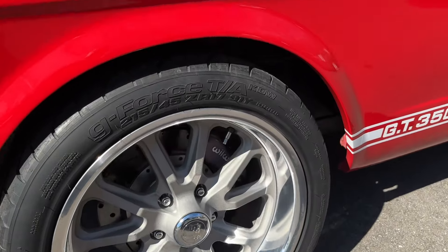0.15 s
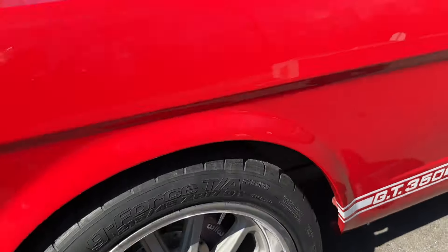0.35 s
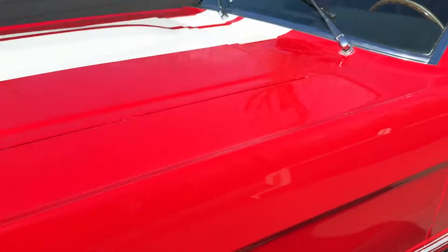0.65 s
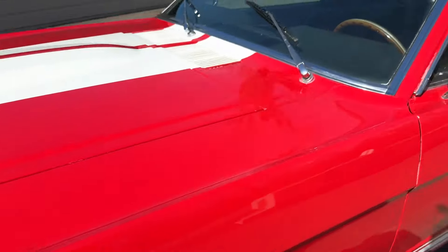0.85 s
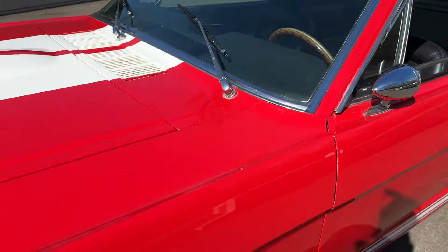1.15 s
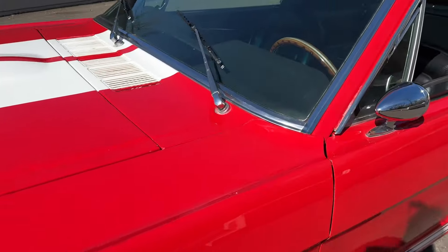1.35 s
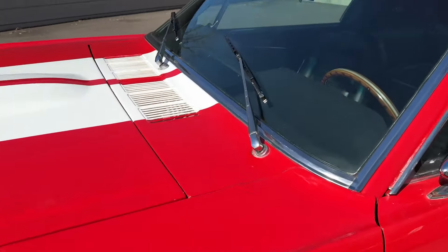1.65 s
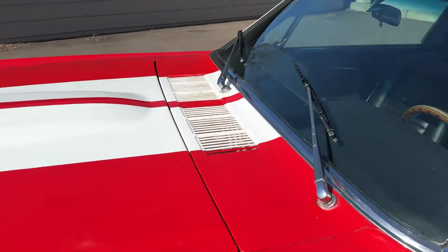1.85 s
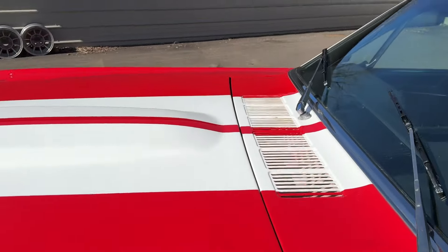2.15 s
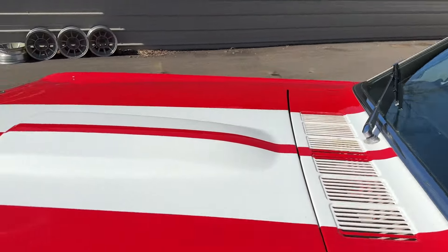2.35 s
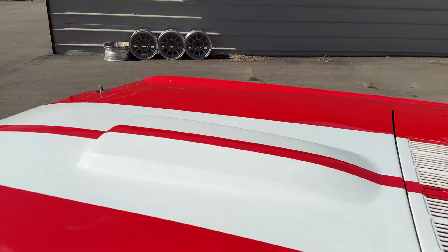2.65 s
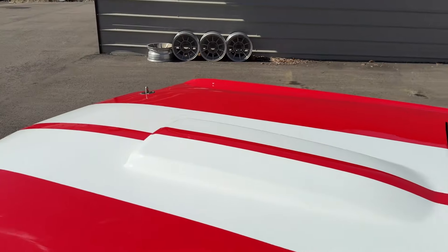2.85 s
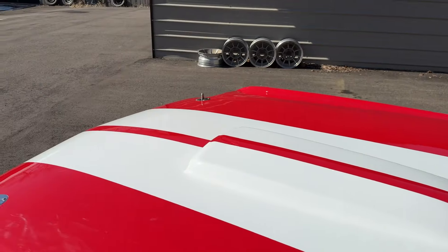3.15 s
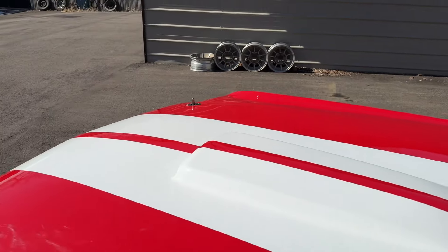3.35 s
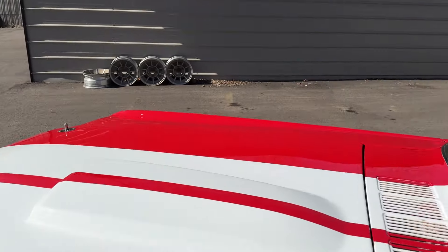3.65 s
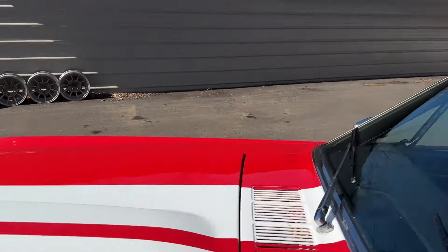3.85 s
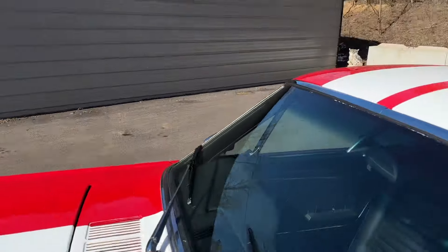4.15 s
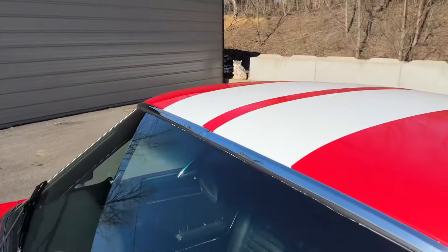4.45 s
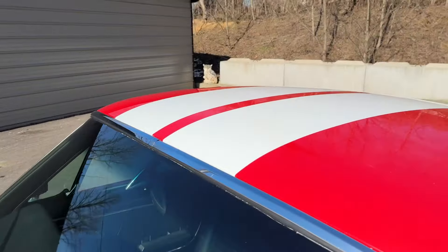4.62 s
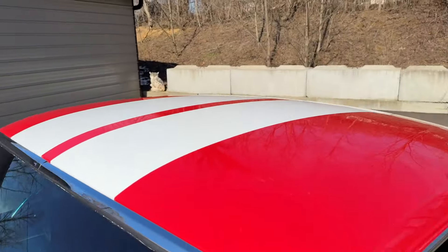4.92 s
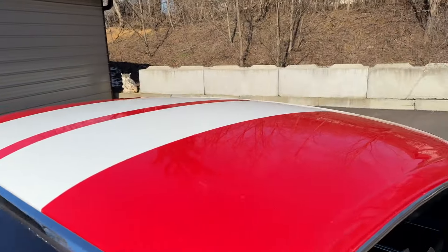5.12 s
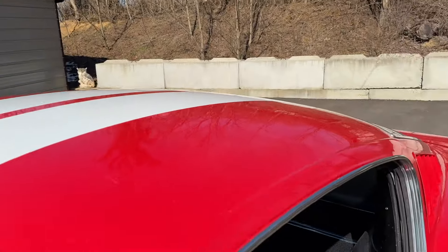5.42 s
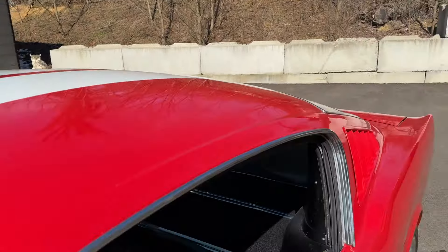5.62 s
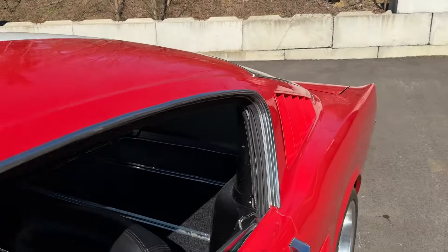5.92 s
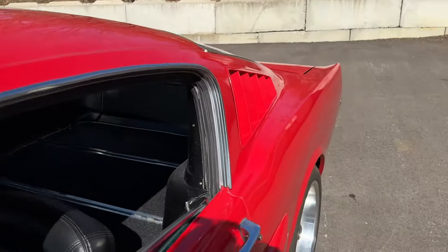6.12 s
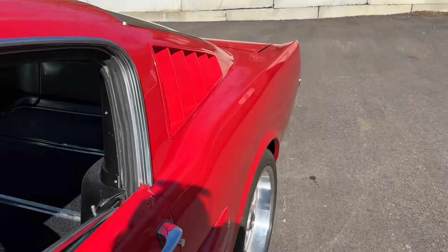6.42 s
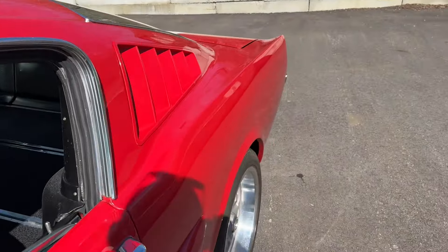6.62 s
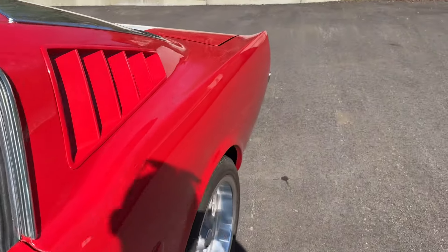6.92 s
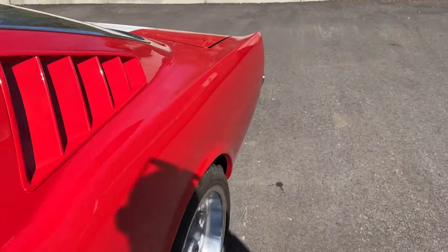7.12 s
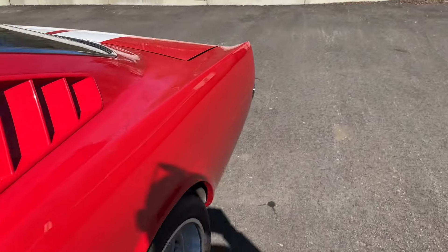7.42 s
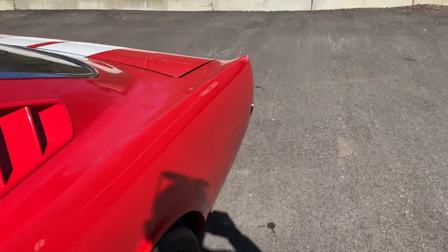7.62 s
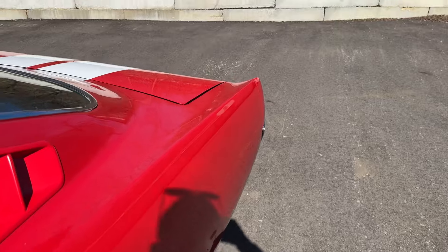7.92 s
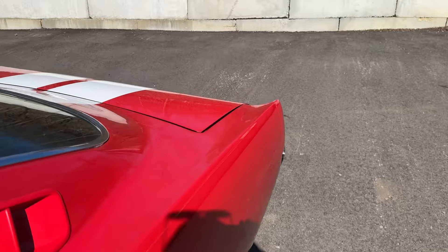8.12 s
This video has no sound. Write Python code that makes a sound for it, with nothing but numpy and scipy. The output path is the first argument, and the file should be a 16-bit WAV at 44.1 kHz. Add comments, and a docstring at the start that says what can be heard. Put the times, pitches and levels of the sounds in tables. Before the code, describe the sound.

A large V8 car engine idles with a lumpy, pulsing beat, its exhaust growing throatier with sharp puffs and faint metallic pings.

```python
"""A walled yard, where a large V8 idles with a lope as a phone is carried from the bonnet to the tail.
Every second engine cycle burns well: the firings swell, boom in the exhaust and echo off the walls.
Gas rushes and puffs from the tailpipes, and a pipe tip pings now and then. Valve gear beats along;
intake hiss and fan fall back with the bonnet. Left and right are out of phase in the treble."""
import sys
import numpy as np
from scipy import signal
from scipy.fft import rfft, irfft, next_fast_len
from scipy.io import wavfile
from scipy.ndimage import uniform_filter1d

SR = 44100
rng = np.random.default_rng(int(sys.argv[2]) if len(sys.argv) > 2 else 0)


def wav_out(sig):
    """Save sig, one row per channel (or a flat mono array), as 16-bit PCM at SR to the path in sys.argv[1]."""
    wavfile.write(sys.argv[1], SR, np.round(np.clip(np.atleast_2d(sig).T, -1, 1) * 32767).astype(np.int16))


N = 364702
FREQS = np.fft.rfftfreq(next_fast_len(N + 8192), 1 / SR)

def amp(db):
    return 10 ** (np.asarray(db) / 20)

def unit(x):
    return x / np.sqrt(np.mean(x ** 2) + 1e-20)

def along(points, hz):
    """Read (Hz, value) points on a log axis."""
    f, value = np.transpose(points)
    return np.interp(np.log(hz + 1), np.log(f + 1), value)

def curves(rows):
    """An automation curve for each column after the time."""
    times, *columns = np.transpose(rows)
    return [np.interp(np.arange(N) / SR, times, column) for column in columns]

def filtered(x, response):
    size = 2 * (len(FREQS) - 1)
    return irfft(rfft(x, size) * response(FREQS), size)[..., :N]

def ringing(x, centre, width, db):
    """Steep resonances side by side, brought to rms 1."""
    f = np.geomspace(10, SR / 2, 1500)[:, None]
    power = ((f * width) ** 2 / ((centre ** 2 - f * f) ** 2 + (f * width) ** 2)) ** 2
    return unit(filtered(x, lambda hz: np.interp(hz, f[:, 0], np.sqrt(power @ amp(2 * db)))))

def rush(patchy_db, spectrum=((20, 0),)):
    """Two unrelated noises of rms 1 that share patches of random gain."""
    real, imag = rng.standard_normal((2, 2, 257, N // 192 + 3))
    patches = uniform_filter1d(rng.standard_normal(real.shape[1:]), size=4, axis=0)
    patches = unit(uniform_filter1d(patches, size=9, axis=1))
    gain = amp(patchy_db * patches + along(spectrum, np.fft.rfftfreq(512, 1 / SR))[:, None])
    return unit(signal.istft((real + 1j * imag) * gain, nperseg=512, noverlap=320)[1][:, :N])

def train(times, sizes):
    """Impulses, brought to rms 1."""
    heard = (times > 0) & (times < (N - 1) / SR)
    return unit(np.bincount((times[heard] * SR).astype(int), sizes[heard], N))

def pumping(pulses, steady, t60, rise_ms=8):
    """A steady flow plus a burst that swells and dies with each pulse."""
    span = int(rise_ms * SR / 2000)
    swell = uniform_filter1d(uniform_filter1d(pulses, span), span)
    bursts = unit(signal.lfilter([1], [1, -amp(-60 / (t60 * SR))], swell))
    return unit(steady + bursts)

# The lope's swells, sixteen firings apart. Each row: heart in seconds, strength in dB,
# depth of the next lull as a share of the usual, that lull's delay in firings.
SWELLS = [(-.23, 1.5, 0.18, 0), (0.09, -1, 0.34, -0.91), (.390, -1.5, 1.1, -0.48), (0.719, 1, 0.84, -1.1),
          (1.038, -0.5, 1.2, 0.27), (1.353, 1, 1.05, -0.45), (1.671, 1.5, 1.52, 0.23),
          (1.985, -0.5, 0.8, 1), (2.300, -1, 1.14, 0.6), (2.631, 0.5, 1.13, -0.06), (2.934, -1, 0.69, 0.65),
          (3.263, -1, 0.97, -.4), (3.581, 1, 1.1, 0.64), (3.898, -1, 0.76, 1), (4.213, -0.5, 1.04, .4),
          (4.523, 1, 0.92, -0.24), (4.835, -0.5, 0.94, 1), (5.158, -0.5, 1.2, .6), (5.485, 1.5, 1.42, 0.45),
          (5.798, 1, .9, 0.5), (6.097, 0, 0.85, -0.57), (6.403, -0.5, 0.87, .3), (6.740, -0.5, .6, -1.1),
          (7.015, -1, 1.04, -0.22), (7.337, 1.5, 0.87, 0.2), (7.669, -1.5, 0.92, 0.9), (7.985, 0, 0.51, .6),
          (8.30, -3.5, 1.0, 0)]
# Firing order; unequal pipes delay some pulses. Each row: delay in ms, accent in dB.
CYLINDERS = [(0, -0.5), (1, -6.5), (-2, -1.5), (-4, -7), (-5.5, -3), (-6, -2.5), (-2, -1), (-2, -6)]

def firings(surge_ms, jitter_ms, scatter_db):
    """The cylinders fire in turn, a little early or late, strong or weak."""
    count = np.arange(16 * (len(SWELLS) - 1))
    late_ms, accent_db = np.transpose(CYLINDERS)[:, count % 8]
    jitter, scatter = rng.standard_normal((len(count), 2)).T
    early_ms = surge_ms * np.sin(2 * np.pi * count / 16)  # the crank speeds up after good burns
    beat = np.interp(count / 16, np.arange(len(SWELLS)), np.transpose(SWELLS)[0])
    times = beat + (late_ms - early_ms + jitter_ms * jitter) / 1000
    return times, amp(accent_db + scatter_db * scatter)

# Tone blend. Each row: time in seconds, blend from 0 (a brighter whirr) to 1 (a hollower pipe ring).
TONE_BLEND = [(0, 0.5), (2, 0.33), (3.9, 0.32), (4.3, 0.1), (4.8, 0.3), (5.4, 0.54), (6, 0.8), (8.27, 0.98)]
# How each layer rides a swell. Each entry: full from, full until and quietest at, in firings
# from the heart, then lull depth in dB for the bright tone and for the hollow tone.
LOPE = {"boom": (2, -0.9, 5.5, 16, 13), "throb": (-0.76, 2.2, 7.5, 9, 8.5),
        "bark": (0.76, 3, 8.95, 14.3, 14.6), "rasp": (-1.5, 2.5, 9, 10, 10.5),
        "gear": (0.6, 2, 7.5, 3.5, 8.5), "gas": (-1.4, 1, 8, 4, 14)}

def lope(layer):
    """A layer's ride in dB: it holds, sinks into the lull and climbs to the next swell."""
    times, strength_db, depth, late = np.transpose(SWELLS)
    start, end, low, bright_db, hollow_db = LOPE[layer]
    hearts = 16 * np.arange(len(times))
    firing = np.interp(np.arange(N) / SR, times, hearts)
    knots = hearts[:, None] + [start, end, low] + late[:, None] * [0, 1, 1]
    sunk = np.interp(firing, knots.ravel(), (depth[:, None] * [0, 0, 1]).ravel())
    lull_db = bright_db + curves(TONE_BLEND)[0] * (hollow_db - bright_db)
    return np.interp(firing, hearts, strength_db) - sunk * lull_db

# The mix. Each row: time in seconds, then boom, throb, bark, rasp, gear and gas in dB.
FADERS = [(0, -20.5, -16, -21.5, -27, -30, -35.5), (1.2, -15.5, -17, -19.5, -32, -33, -39.5),
          (1.9, -18.5, -19, -18, -30.5, -34, -40), (2.9, -15.5, -19, -26, -31.5, -34.5, -42.5),
          (4.1, -16.5, -19.5, -22, -30.5, -35.5, -42.5), (5.0, -15, -16.5, -21, -30.5, -36.5, -44.5),
          (5.7, -16, -16, -18, -30.5, -33, -40), (6.3, -17, -13.5, -15.5, -26.5, -29, -37.5),
          (7.3, -18.5, -13, -16.5, -29, -30.5, -39.5), (8.27, -20.5, -12, -15, -26.5, -29.5, -40.5)]

def level(layer):
    """A layer's gain: its fader plus the lope."""
    return amp(curves(FADERS)[list(LOPE).index(layer)] + lope(layer))

def humming(noise, modes):
    """Noise in resonances, crossfaded between the bright and the hollow tone."""
    hz, width, bright_db, hollow_db = np.transpose(modes)
    bright, hollow = ringing(noise, hz, width, bright_db), ringing(noise, hz, width, hollow_db)
    blend = curves(TONE_BLEND)[0]
    return (1 - blend) * bright + blend * hollow

# Pipe overtones. Each row: pitch and width in Hz, bright and hollow weights in dB.
RASP = [(334, 46, -5.5, -1), (372.8, 18.5, 2.5, -0.5), (416, 120, -9, -10), (504.6, 27, -8, 0),
        (554, 81, -8.5, -8.5), (636, 56, -5, -2), (712, 61, -7.5, -6.5)]

def pipe_rasp(pulses):
    """Turbulence sounds the pipe's overtones."""
    return level("rasp") * humming(pumping(pulses, steady=4, t60=.12) * rush(patchy_db=2), RASP)

def yard_echoes(times, sizes, t60, count):
    """Ground, car and walls return each pulse by paths that change as the phone moves; two sets."""
    delays = t60 / 2 * rng.random((2, len(times), count))
    echoes = sizes[:, None] * amp(-60 * delays / t60) * rng.standard_normal(delays.shape)
    return np.array([train(times[:, None] + delay, echo) for delay, echo in zip(delays, echoes)])

# The long pipe's boom, the silencer chambers' throb and bark. Each row: pitch and width in Hz,
# weight in dB.
BOOM = [(47.8, 15.4, 7), (30, 17, -30)]
THROB = [(78, 21.4, -4), (103.3, 26, -5), (118.5, 26.6, -1), (144.9, 18.7, -0.5), (169, 18.5, -9)]
BARK = [(206, 22.8, -1.5), (245.1, 34, 0), (277.7, 17, -6.5)]

def exhaust(times, sizes):
    """Pulses and their echoes ring the long pipe and the silencer chambers."""
    direct = train(times, sizes) * [[1], [0]]
    echoes = yard_echoes(times, sizes, t60=.25, count=36)
    clear = np.clip(1.01 + lope("boom") / 16, .35, 1)  # weak burns drown in the echoes of strong ones
    sound = 0
    for layer, modes, echo_db in [("boom", BOOM, -12), ("throb", THROB, -1.5), ("bark", BARK, 3)]:
        drive = (clear * direct + amp(echo_db) * echoes) / np.hypot(clear, amp(echo_db))
        sound += level(layer) * ringing(drive, *np.transpose(modes))
    return sound

# Valve gear, belts and pipe tips. Each row: pitch and width in Hz, bright and hollow weights in dB.
GEAR = [(830, 140, 0, 3), (931, 53, 3, 5), (1028, 43, 0.5, 10.5), (1134, 275, -1, 1), (1385, 37, -4.5, 4),
        (1420, 320, -2, -3), (1630, 39, 2.5, 2.5), (1775, 380, -5, -3.5), (1990, 83, -3, -2),
        (2232, 420, -1.5, -7.5), (2609, 66, 2.5, -13.5), (2814, 380, -7, -13)]

def valve_gear(pulses):
    """A mechanical whirr that beats gently with the firings."""
    return level("gear") * humming(pumping(pulses, steady=5, t60=.15) * rush(patchy_db=2.5), GEAR)

# The intake's fader. Each row: time in seconds, level in dB.
INTAKE_FADER = [(0, -44.5), (2.5, -41), (2.75, -38), (4.35, -40.5), (4.7, -43.5), (6.2, -51), (6.5, -55),
                (8.27, -69)]
# Its colour. Each row: frequency in Hz, EQ in dB.
INTAKE_EQ = [(6000, -33), (7500, -12), (9300, -3.5), (11000, -13.5), (12500, -9.5), (14200, 2), (15300, -8),
             (15900, -8)]

def intake():
    """Indrawn air hisses near the bonnet."""
    return amp(curves(INTAKE_FADER)[0]) * rush(patchy_db=4.5, spectrum=INTAKE_EQ)

# The fan's fader. Each row: time in seconds, level in dB.
FAN_FADER = [(0, -33), (3.8, -33.5), (4.6, -37), (8.27, -36)]
# Its colour. Each row: frequency in Hz, EQ in dB.
FAN_EQ = [(120, -31), (200, 5), (250, -3), (436, -19), (660, -16.5), (1290, -22.5), (1660, -31.5),
          (3000, -31.5), (6980, -38.5), (8310, -47), (9000, -44), (11700, -72), (19800, -120)]

def cooling_fan():
    """A low bed of moving air, left behind with the bonnet."""
    return amp(curves(FAN_FADER)[0]) * rush(patchy_db=1.5, spectrum=FAN_EQ)

# Tailpipe puffs. Each row: start in seconds, level in dB.
PUFFS = [(0.037, -33.5), (0.2568, -33), (0.5711, -40), (0.8939, -41), (1.0779, -35.5), (1.3045, -36),
         (1.3728, -35), (1.5693, -38), (1.6881, -41), (1.7409, -37), (5.7585, -40), (5.8167, -46),
         (5.8591, -36), (6.0457, -36), (6.116, -33), (6.303, -36), (6.3515, -37), (6.4248, -34),
         (6.6533, -37.5), (6.6867, -48), (6.7256, -35), (6.772, -36.5), (6.9022, -41), (6.9646, -40),
         (7.0005, -42), (7.0319, -34.5), (7.24, -35), (7.3023, -33), (7.3532, -36), (7.5832, -35.5),
         (7.6936, -31), (7.753, -39), (7.894, -37.5), (7.9733, -35), (8.0606, -35.5), (8.1584, -36)]
# The colour of the gas. Each row: frequency in Hz, EQ in dB.
GAS_EQ = [(2200, -38), (2900, -8), (3400, 2.5), (4000, -1), (5000, -1.5), (5800, -1.5), (7000, -5.5),
          (8600, 0.5), (11000, -7), (14000, -8), (15800, -7)]

def tailpipes(pulses, puff_t60=.21, spit_t60=.034, attack_s=.0012):
    """Gas rushes with the firings; each puff spits sharply and dies away."""
    puffs, t = np.zeros(N + SR), np.arange(SR // 5) / SR
    spit = 1 + .59 * amp(-60 * t / spit_t60)
    puff = amp(-60 * t / puff_t60) * spit * (1 - np.exp(-t / attack_s))
    for start, db in PUFFS:
        puffs[round(start * SR):][:len(t)] += amp(db) * puff
    flow = level("gas") * pumping(pulses, steady=5, t60=.12)
    return np.hypot(flow, puffs[:N]) * rush(patchy_db=3, spectrum=GAS_EQ)

# Pipe tip pings. Each row: start in seconds, level in dB, pitch in Hz.
PINGS = [(0.7417, -23.5, 2200), (1.3394, -26, 2140), (1.6212, -30, 2180), (3.5603, -31, 2000),
         (3.8332, -25, 2100), (4.1495, -31, 2000), (6.0861, -21, 2000), (6.3824, -29, 2100),
         (6.7336, -26, 1960), (7.0379, -23, 2020), (7.2459, -29, 1980), (7.3617, -20, 1950),
         (7.5872, -31, 2050), (7.6645, -21, 1910), (7.6944, -19, 1990), (7.7513, -22, 1850),
         (7.9753, -14, 1950), (8.0651, -22, 2060), (8.1618, -23, 2000)]

def tip_pings(t60=.069, attack_s=.0025, waver_rad=.06):
    """The pipe tip rings briefly with a wavering tone."""
    sound, t = np.zeros(N + SR), np.arange(SR // 5) / SR
    envelope = amp(-60 * t / t60) * (1 - np.exp(-t / attack_s))
    for start, db, hz in PINGS:
        drift = waver_rad * np.cumsum(rng.standard_normal(len(t)))
        sound[round(start * SR):][:len(t)] += amp(db) * envelope * np.sin(2 * np.pi * hz * t + drift)
    return sound[:N] * [[1], [0]]

# A midrange scoop. Each row: time in seconds, share of the band lost from 0 to 1.
SCOOP = [(0, 0), (4.1, 0), (4.5, .5), (5.5, .5), (5.9, 0), (8.27, 0)]

def passing_cabin(car, centre_hz=1270, width_hz=220):
    """The mids thin while the phone passes the cabin."""
    band = filtered(car, lambda hz: np.exp(-.5 * ((hz - centre_hz) / width_hz) ** 2))
    return car - curves(SCOOP)[0] * band

# The stereo image. Each row: frequency in Hz, then the sides' likeness from 0 to 1 (LIKENESS),
# the left's lead in radians (LEFT_LEAD) or left minus right in dB (LEFT_TILT).
LIKENESS = [(50, 1), (200, 0.91), (500, 0.57), (1800, 0.25), (4000, 0.53), (7000, 0.72), (9000, 1),
            (15000, 1)]
LEFT_LEAD = [(0, 0), (430, -0.1), (3880, 0.5), (8270, -0.2), (9130, -2.6), (10200, -3.8), (10500, -6.2),
             (11600, -6.4), (12100, -9.2), (13000, -9.7), (13800, -12.6), (14400, -12.6), (15200, -15.7),
             (15700, -15.7)]
LEFT_TILT = [(60, 0), (120, -1.5), (240, -1.0), (480, -2), (950, -2.0), (1890, -3), (3770, 3.5),
             (7520, 0.0), (15000, 0.0)]

def stereo_image(pair):
    """Left and right share a common part and drift out of phase in the treble, widening the hiss."""
    spread = np.arccos(along(LIKENESS, FREQS)) / 2
    common, apart = filtered(pair, lambda hz: np.array([np.cos(spread), np.sin(spread)]))
    side = np.array([[.5], [-.5]])
    shade = amp(side * along(LEFT_TILT, FREQS))
    phase = side * np.interp(FREQS, *np.transpose(LEFT_LEAD))
    return filtered(np.array([common + apart, common - apart]), lambda hz: shade * np.exp(1j * phase))

def scene():
    times, sizes = firings(surge_ms=4.84, jitter_ms=.86, scatter_db=1.5)
    pulses = train(times, sizes)
    pipes = pipe_rasp(pulses) + exhaust(times, sizes) + tip_pings() + tailpipes(pulses)
    engine_bay = valve_gear(pulses) + intake() + cooling_fan()
    return stereo_image(passing_cabin(pipes + engine_bay))

def record(dry):
    """The phone rounds the loudest peaks and cuts the very top."""
    soft = dry / (1 + np.abs(dry / 1.05) ** 4) ** (1 / 4)
    return filtered(soft, lambda hz: hz < 15900)

dry = scene()
out = record(dry)
wav_out(out)
```